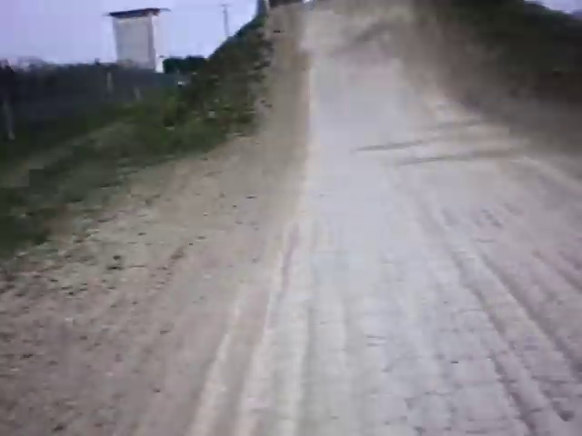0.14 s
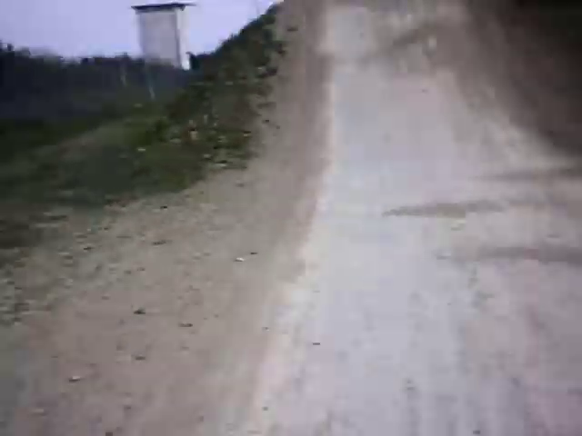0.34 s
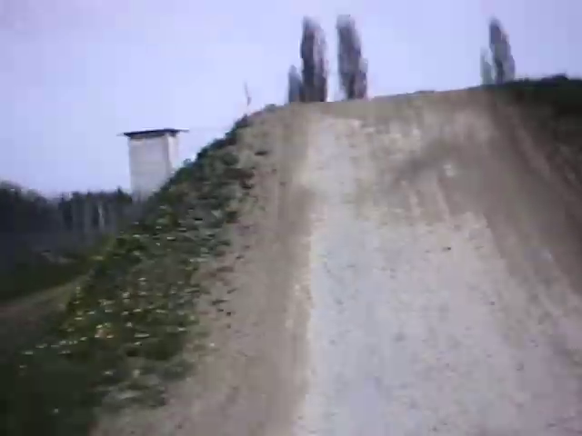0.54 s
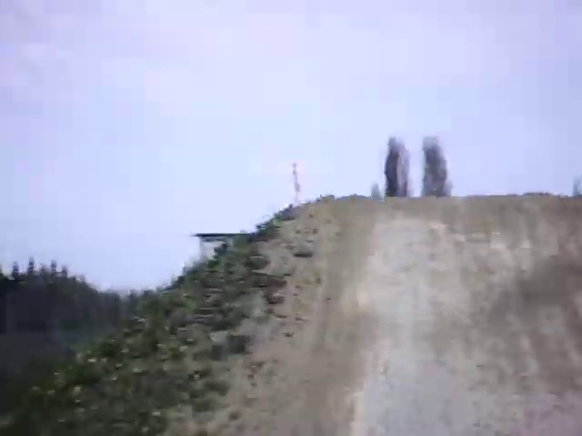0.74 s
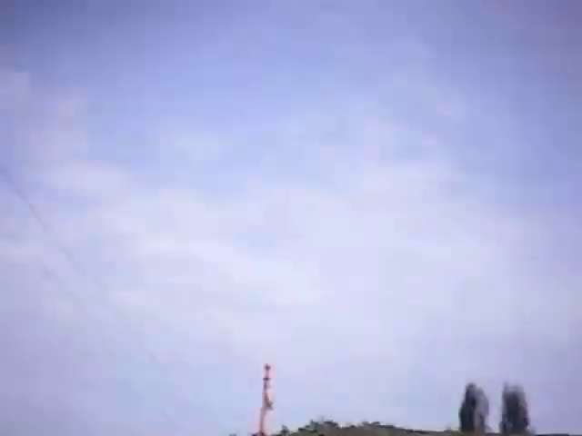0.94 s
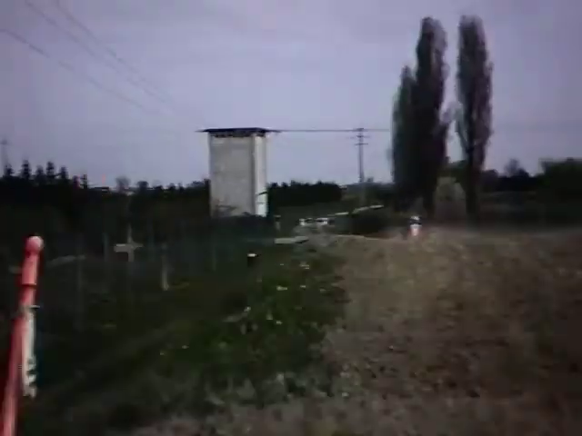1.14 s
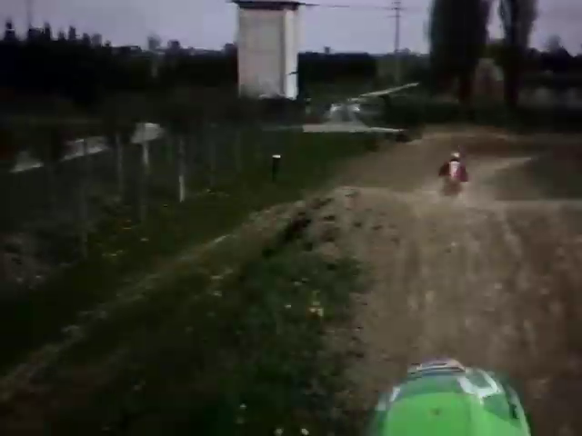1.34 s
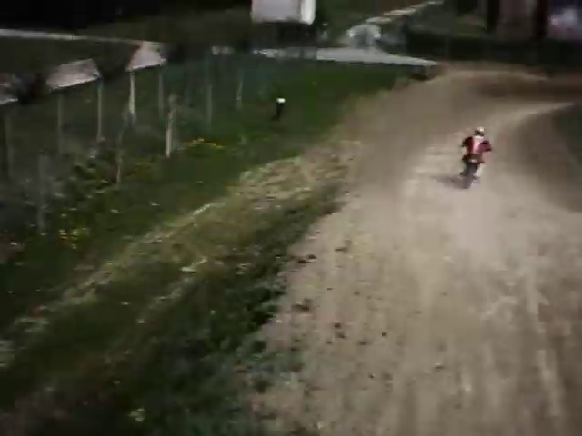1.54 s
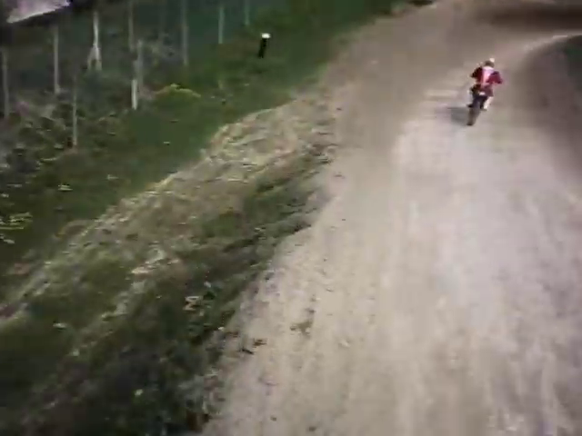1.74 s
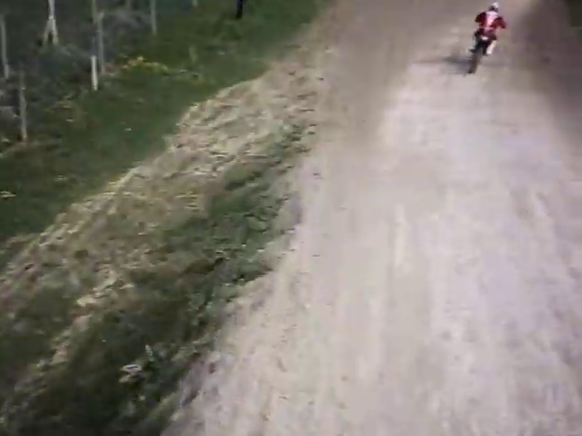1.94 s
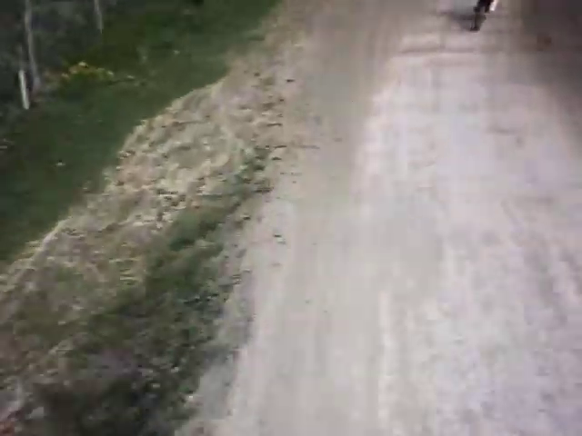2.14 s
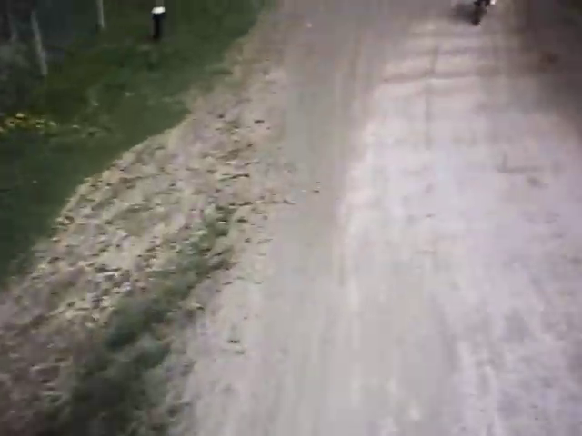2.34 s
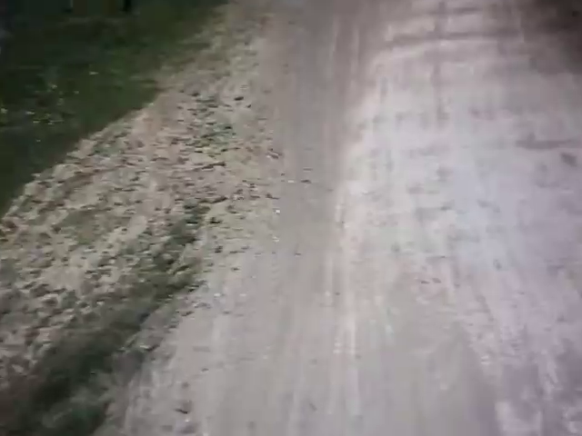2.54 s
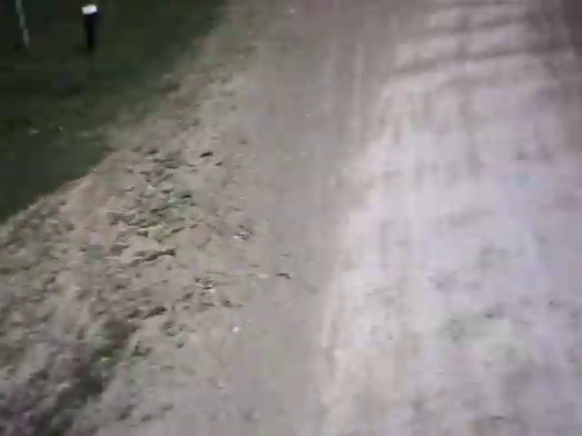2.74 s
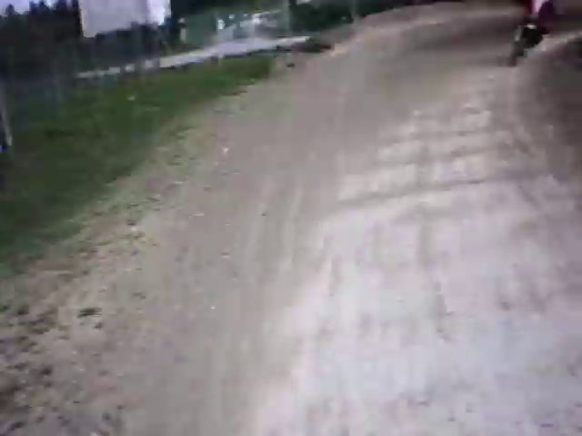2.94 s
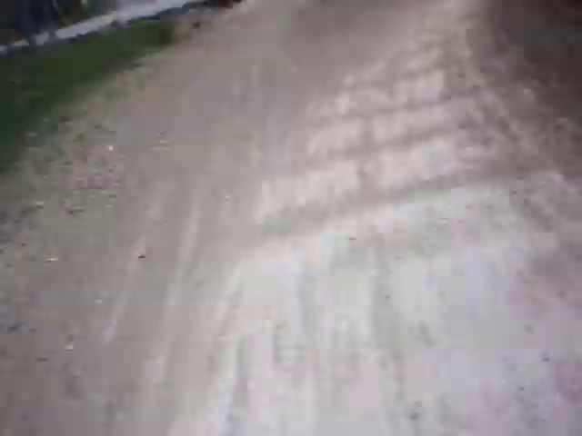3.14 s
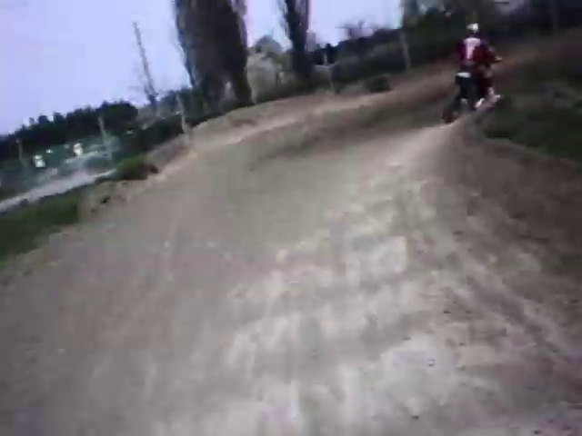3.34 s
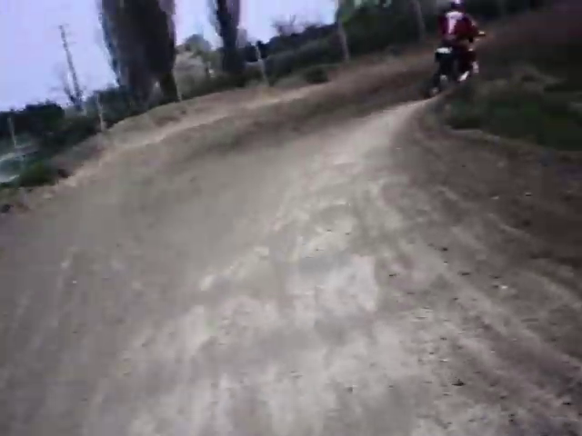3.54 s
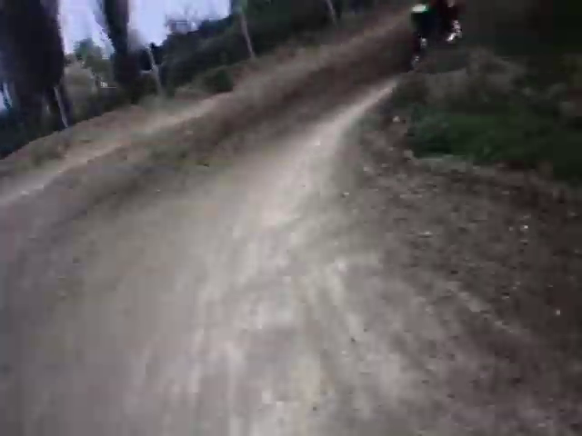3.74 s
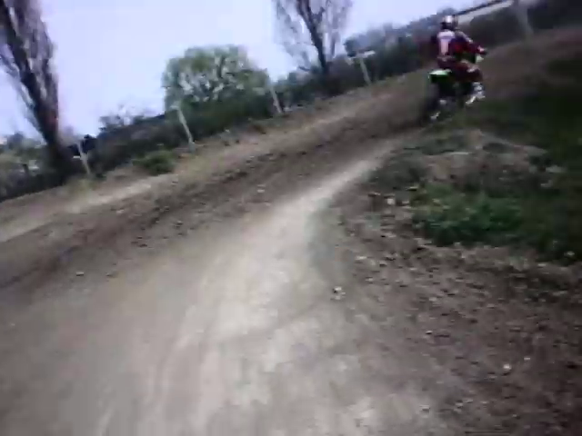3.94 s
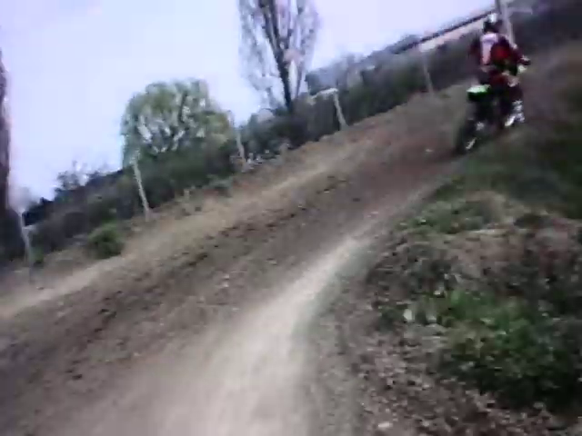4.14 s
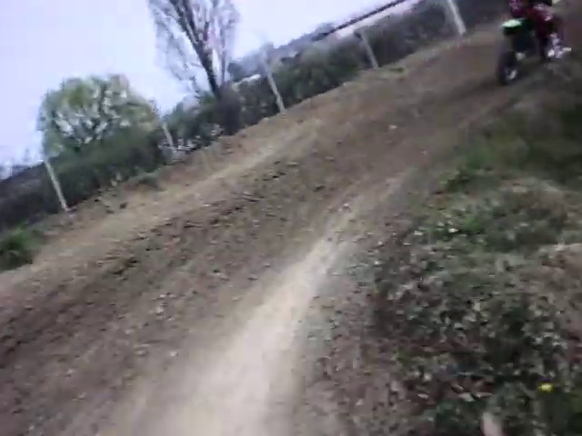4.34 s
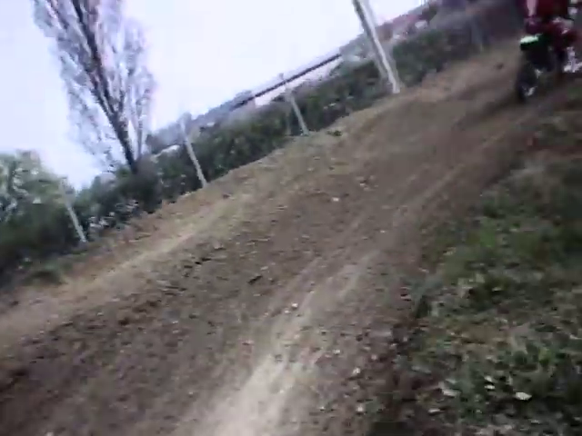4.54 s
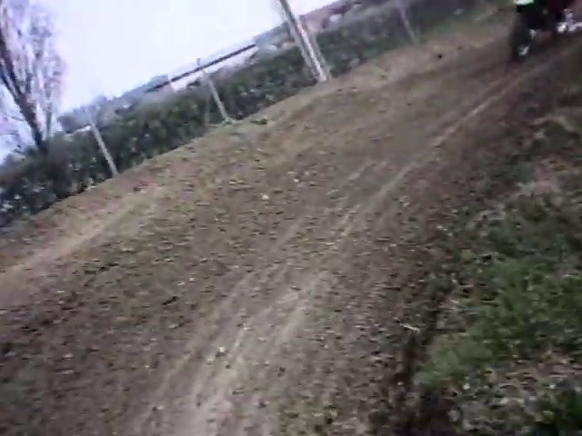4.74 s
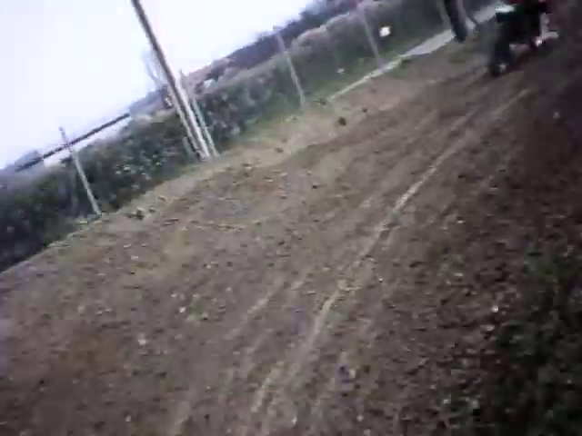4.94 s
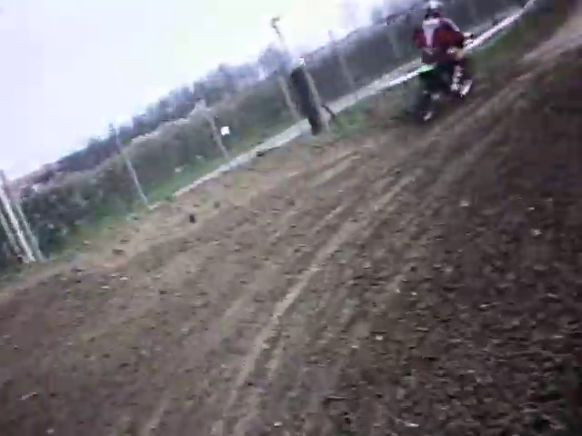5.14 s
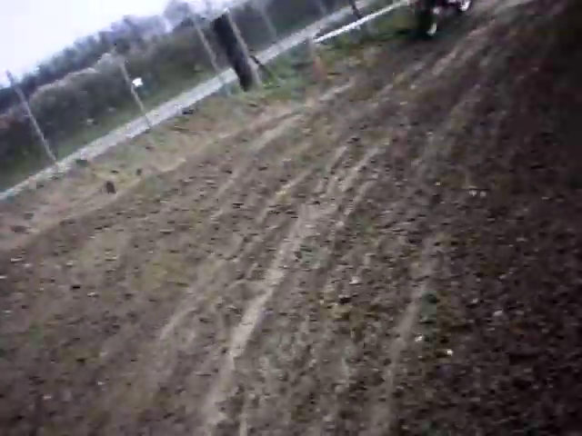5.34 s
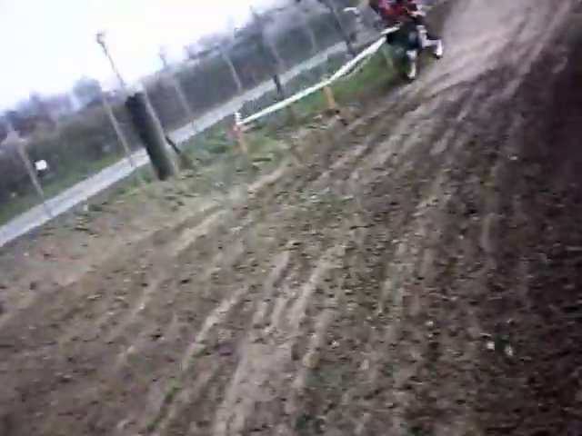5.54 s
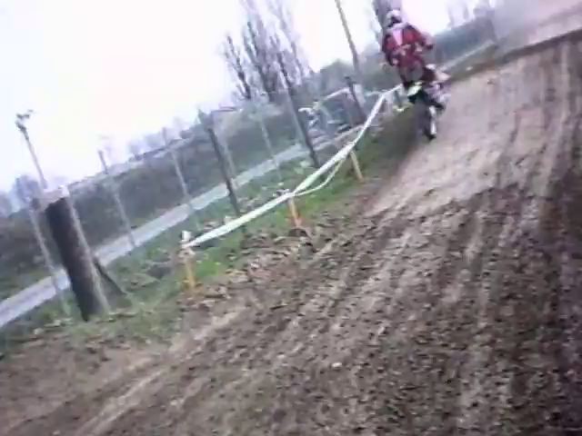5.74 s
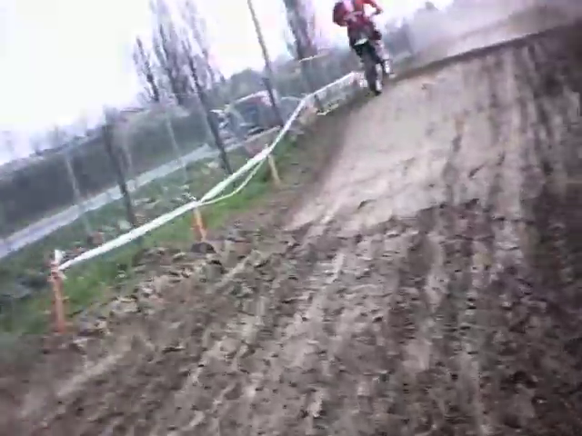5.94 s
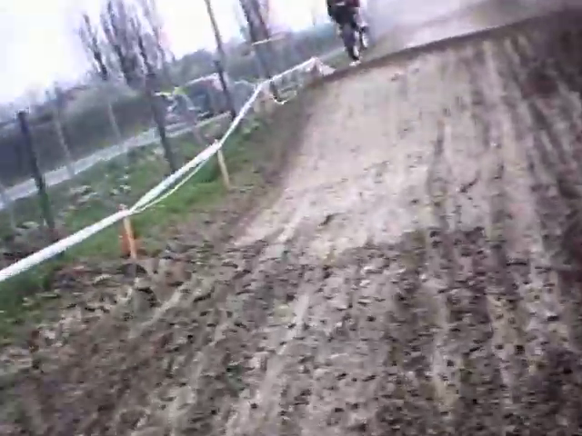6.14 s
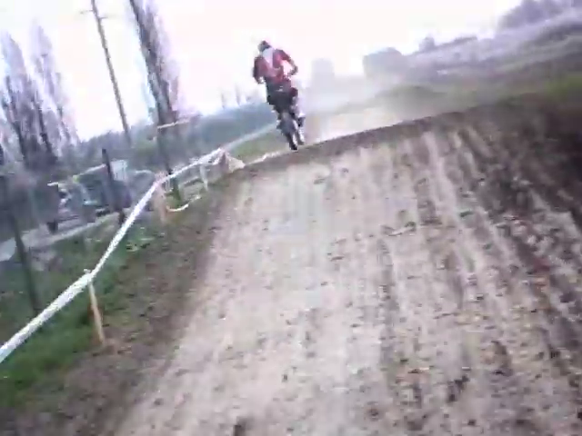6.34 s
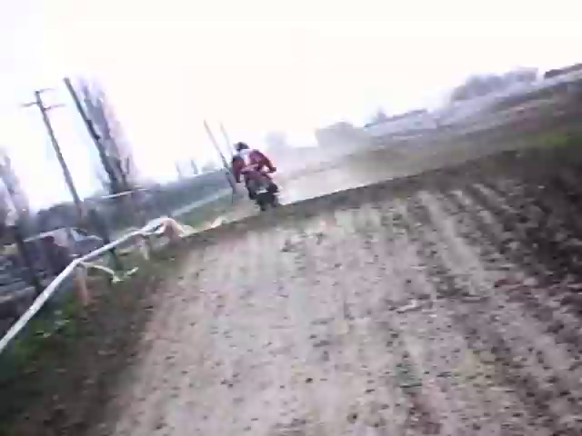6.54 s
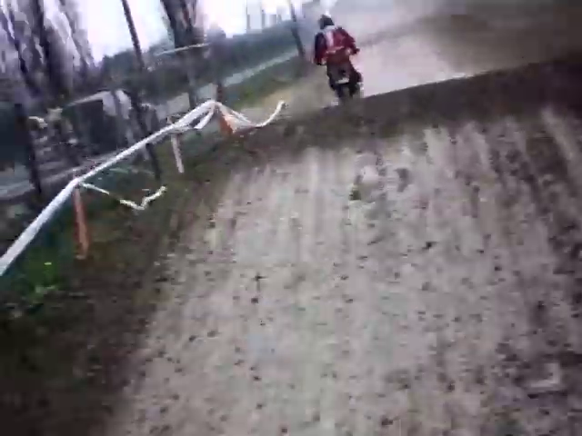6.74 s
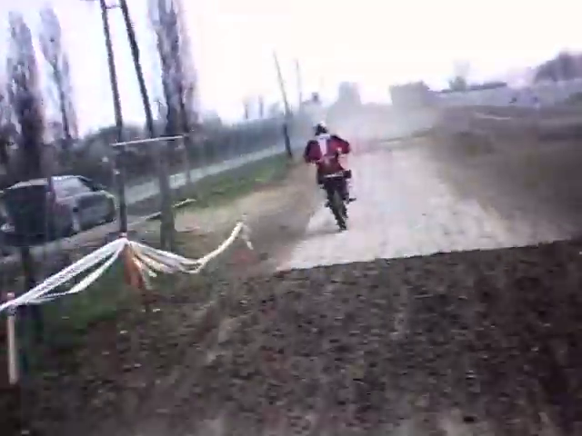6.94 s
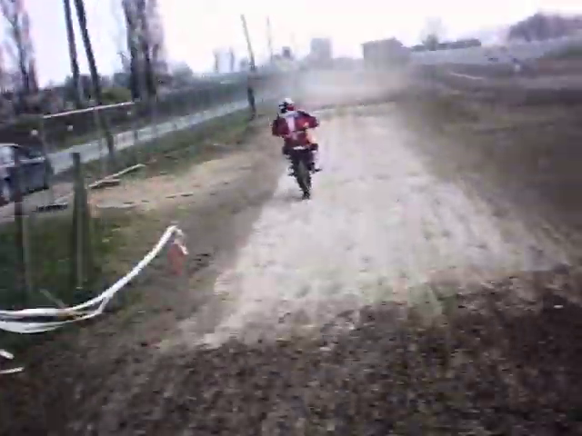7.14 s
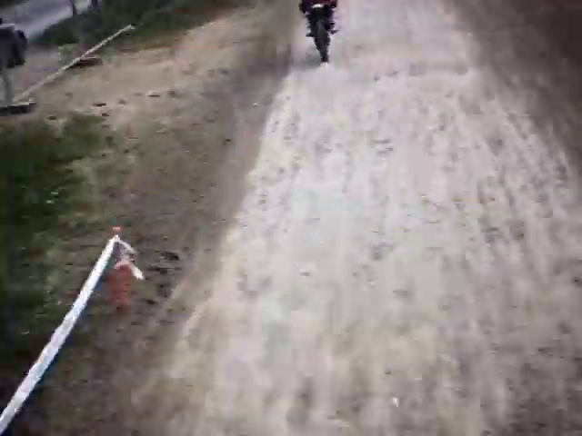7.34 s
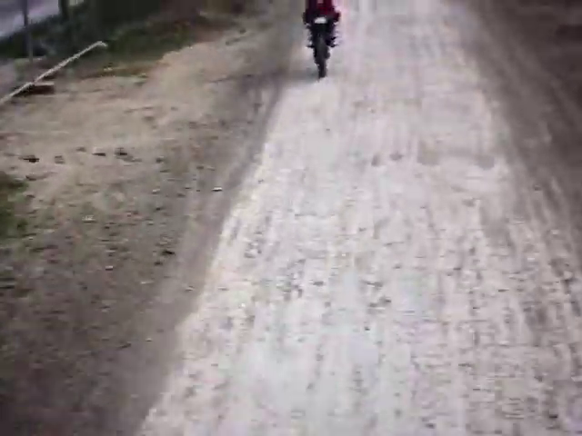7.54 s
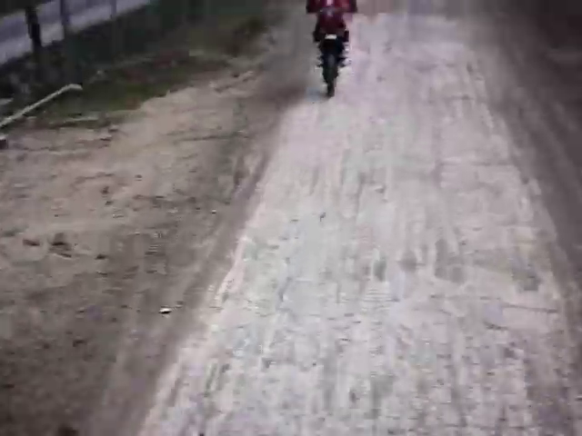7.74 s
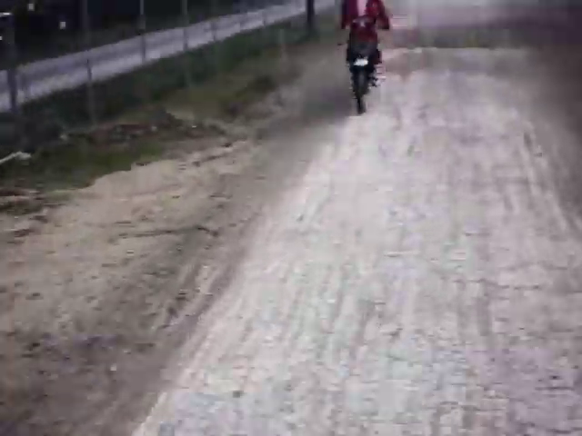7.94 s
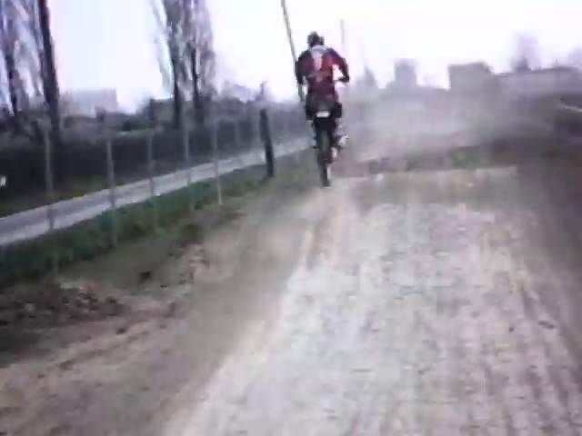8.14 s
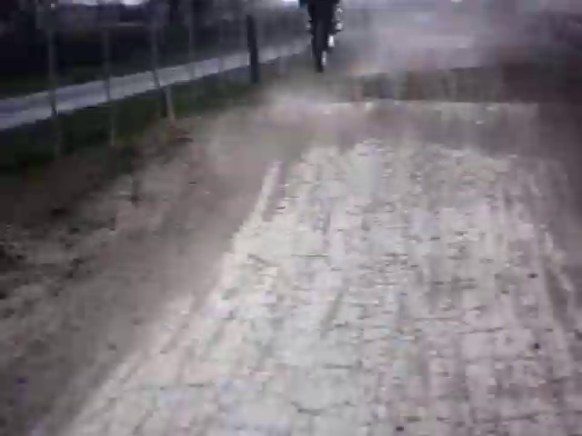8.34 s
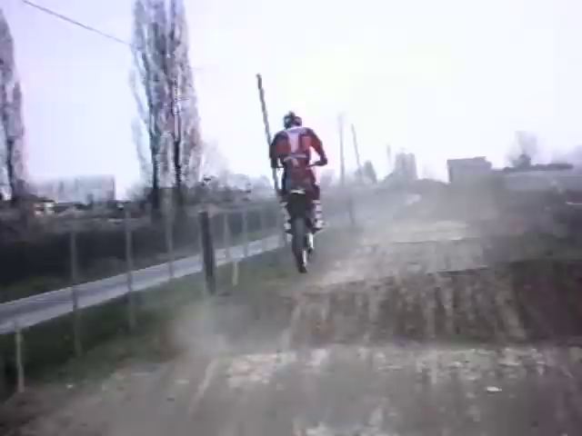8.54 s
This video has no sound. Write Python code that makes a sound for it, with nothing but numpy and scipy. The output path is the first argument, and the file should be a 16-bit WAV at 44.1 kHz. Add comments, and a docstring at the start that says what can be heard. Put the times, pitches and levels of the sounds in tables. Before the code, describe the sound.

Close on a four-stroke dirt bike, the engine barks at full throttle up a ramp, then cuts back with chassis knocks at the crest. It coasts with short throttle blips, tyres crunching and wind rumbling, and drops to a low chug in a bend while a two-stroke whines ahead. It pulls away with sharp pops, eases and blasts again. Muffled, narrow-band microphone on the rider, overloaded at the loudest peaks.

```python
"""A four-stroke dirt bike laps a dirt track, heard from its rider: firing clicks excite airbox and exhaust modes.
It barks up a jump, coasts with a few throttle blips, idles round a bend and pulls away again with pops.
Chain and valve gear clatter and the chassis knocks over bumps: ticks and clicks through one frame spectrum.
Tyres crunch, wind rumbles and bumps buffet the microphone: filtered noise that follows pace and ground.
A two-stroke ahead whines in harmonics and hiss; a narrow-band recorder clips the loudest peaks."""
import sys
import numpy as np
from scipy import signal
from scipy.fft import rfft, irfft
from scipy.io import wavfile
from scipy.ndimage import uniform_filter1d

SR = 44100
rng = np.random.default_rng(int(sys.argv[2]) if len(sys.argv) > 2 else 0)


def dump(signal):
    """Clip the signal to [-1, 1] and save it as 16-bit WAV at the path in sys.argv[1]."""
    limited = np.clip(np.atleast_2d(signal).T, -1, 1)
    pcm = np.round(limited * 32767).astype(np.int16)
    wavfile.write(sys.argv[1], SR, pcm)


N = 382788

# exhaust resonances, bark and rasp: (frequency [Hz], bandwidth [Hz], gain [dB])
BARK_MODES = [(510, 110, -25.5), (632, 47, -10.5), (973, 39, -1.5), (1210, 45, 4), (1334, 57, 5.5),
              (1366, 85, 6.5), (1459, 152, -0.5), (1789, 43, -2.5)]
RASP_MODES = [(2048, 220, 0.5), (2860, 410, 0.5), (3276, 204, 3), (3900, 490, -8)]
# frame response to ticks and knocks: (frequency [Hz], gain [dB])
FRAME_SPECTRUM = [(200, -25), (430, -17.5), (590, -8), (720, -20), (860, -12), (990, -1.5), (1250, 0),
                  (1460, 0), (1620, -11.5), (1820, -12.5), (2250, -22), (2900, -16), (3380, -17.5),
                  (3650, -24.5), (4200, -27.5)]
# rumble of wind and engine shake: (frequency [Hz], relative level [dB])
RUMBLE_SPECTRUM = [(20, -35), (50, -18.5), (90, -1.5), (130, 0.5), (230, -2), (330, -9), (450, -15),
                   (800, -23.5), (2000, -45.5)]

CRUISE_PER_S = 55  # firing rate at cruising revs
FIRING_AT_S = 5.857  # a combustion falls here, before jitter


def from_db(db):
    """Decibels to gain."""
    return 10 ** (np.asarray(db) / 20)


def rms_one(x):
    """Scale to rms 1."""
    return x / np.sqrt(np.mean(x ** 2) + 1e-20)


def steady(x, size=4001):
    """Hold the running rms near 1, keeping the single pulses."""
    power = uniform_filter1d(uniform_filter1d(x ** 2, size), size // 2)
    return x / np.sqrt(np.abs(power) + 1e-14)


def in_time(rows):
    """Interpolate each column of a (time, ...) table to every sample."""
    time_s, *columns = np.transpose(rows)
    return [np.interp(np.arange(N) / SR, time_s, column) for column in columns]


def drift(knots_per_s):
    """Random curve of rms 1, linear between random knots."""
    knots = rng.standard_normal(2000)
    return rms_one(np.interp(np.arange(N) / SR * knots_per_s, np.arange(len(knots)), knots))


def colour(x, spectrum, size=8192):
    """Causal (minimum-phase) filter with the given spectrum, built by folding the cepstrum."""
    hz, db = np.transpose(spectrum)
    grid_hz = np.maximum(np.arange(size // 2 + 1) * SR / size, 1)
    gain = from_db(np.interp(np.log(grid_hz), np.log(hz), db))
    cepstrum = irfft(np.log(gain))
    cepstrum[1:size // 2] *= 2
    cepstrum[size // 2 + 1:] = 0
    impulse_response = irfft(np.exp(rfft(cepstrum)))
    return signal.fftconvolve(x, impulse_response)[:N]


def resonate(x, modes):
    """Parallel two-pole resonances with alternating signs."""
    out = np.zeros(N)
    for k, (hz, width_hz, db) in enumerate(modes):
        r = np.exp(-np.pi * width_hz / SR)
        poles = [1, -2 * r * np.cos(2 * np.pi * hz / SR), r * r]
        ringing = signal.lfilter([1, 0, -1], poles, x + 1e-18) * (1 - r * r) / 2
        out += (-1) ** k * from_db(db) * ringing
    return out


def band(x, low_hz, high_hz):
    """Band-pass with steep skirts."""
    return signal.sosfilt(signal.butter(3, [low_hz, high_hz], "band", fs=SR, output="sos"), x)


def gate(start_s, end_s, edge_s):
    """1 between two moments, with sloping edges."""
    t = np.arange(N) / SR
    return np.clip(np.minimum(t - start_s, end_s - t) / edge_s + 0.5, 0, 1)


def strikes(rows):
    """One click for each (time [s], level [dB]) row."""
    clicks = np.zeros(N)
    for time_s, db in rows:
        clicks[round(time_s * SR)] = from_db(db)
    return clicks


def puffs(clicks, decay_s):
    """Each click lets out a dying noise burst whose expected energy does not depend on its decay."""
    r = np.exp(-1 / (decay_s * SR))
    envelope = signal.lfilter([np.sqrt(1 - r * r)], [1, -r], clicks + 1e-18)
    return envelope * rng.standard_normal(N)


def firings(per_s, jitter_s, uneven_db):
    """One click per combustion, each a little off in time and strength."""
    turns = np.cumsum(per_s) / SR
    turns -= turns[round(FIRING_AT_S * SR)]
    at = np.flatnonzero(np.diff(np.floor(turns)))
    late_s = jitter_s * rng.standard_normal(len(at))
    strength_db = uneven_db * rng.standard_normal(len(at))
    clicks = np.zeros(N)
    clicks[np.clip(at + np.round(late_s * SR).astype(int), 0, N - 1)] = from_db(strength_db)
    return clicks


def throttle(octaves):
    """Each pull ramps the throttle open, swells while held and dies away once shut."""
    # pulls, gains at cruising revs before swell; boom's is that reached after boom_full_s:
    # (opens [s], shuts [s], bark [dB], airbox boom [dB], rasp [dB])
    pulls = [(-.4, 0.633, -20.5, -12, -23), (1.769, 1.906, -21, -14, -32), (2.789, 2.872, -19, -22, -32.5),
             (5.668, 7.104, -22.5, -21, -33.5), (7.936, 8.173, -18.5, -10.5, -31.5)]
    open_s, shut_s = 0.038, 0.036  # ramp length, decay constant
    bark_db_per_octave, boom_db_per_octave, rasp_db_per_octave = 11, 4.5, 5.5
    bark_db_per_s, boom_db_per_s, rasp_db_per_s = 3.5, 16, 1.5  # swell
    boom_full_s = 0.9
    t = np.arange(N) / SR
    opening, bark, boom, rasp = np.zeros((4, N))
    for opens_s, shuts_s, bark_db, boom_db, rasp_db in pulls:
        held_s = np.clip(t, opens_s, shuts_s) - opens_s
        boom_lack_s = np.maximum(boom_full_s - held_s, 0)
        pull = np.minimum(held_s / open_s, 1) * np.exp(-np.clip(t - shuts_s, 0, 1) / shut_s)
        opening += pull
        bark += pull * from_db(bark_db + bark_db_per_octave * octaves + bark_db_per_s * held_s)
        boom += pull * from_db(boom_db + boom_db_per_octave * octaves - boom_db_per_s * boom_lack_s)
        rasp += pull * from_db(rasp_db + rasp_db_per_octave * octaves + rasp_db_per_s * held_s)
    return opening, bark, boom, rasp


def combustion(fired, bark_gain, boom_gain, rasp_gain):
    """Under throttle every firing thumps the airbox and lets out a barking, rasping burst of gas."""
    # close pair, rings on between firings: (frequency [Hz], bandwidth [Hz], gain [dB])
    airbox_modes = [(251.3, 39.6, -3.5), (287.3, 33.3, -0.5)]
    thump = fired + 0.24 * puffs(fired, decay_s=0.009)
    boom = steady(band(resonate(thump, airbox_modes), 130, 470))
    gas = puffs(fired, decay_s=0.005)
    bark = steady(band(resonate(1.27 * fired + gas, BARK_MODES), 480, 2100))
    crack = puffs(fired, decay_s=0.003)  # sharp front of the burst
    rasp = steady(band(resonate(0.25 * fired + crack + 0.8 * gas, RASP_MODES), 1200, 5000))
    return boom_gain * boom + bark_gain * bark + rasp_gain * rasp


def pops():
    """A rich charge cracks as the throttle snaps open, through the bark and rasp resonances."""
    # extra hard firings: (time [s], click level [dB])
    hard_firings = [(1.8297, 16), (1.8652, 20), (5.7237, 1), (5.8577, 16), (6.0412, 6), (6.4138, 14.5),
                    (6.636, 23), (6.6544, 17), (6.7336, 28), (8.0347, 11), (8.0823, 12)]
    clicks = strikes(hard_firings)
    gas = 0.32 * clicks + puffs(clicks, decay_s=0.0075)
    rasp = from_db(-12.5) * resonate(gas, RASP_MODES)
    return band(resonate(gas, BARK_MODES) + rasp, 500, 5000)


def tailpipe(per_s, octaves, opening):
    """The silencer behind the rider passes only orders 2 and 3 of the firing rate, a little unsteady."""
    # orders 2 and 3: (level at cruising revs [dB], rise [dB per octave], rise under throttle [dB])
    hum_orders = [(-41, 10, 7.5), (-40.5, 14.5, 3.5)]
    angle = 2 * np.pi * np.cumsum(per_s) / SR
    hum = np.zeros(N)
    for k, (db, db_per_octave, open_db) in enumerate(hum_orders, 2):
        level_db = db + db_per_octave * octaves + open_db * opening + 4.1 * drift(12)
        hum += from_db(level_db) * np.sqrt(2) * np.sin(k * angle + 0.25 * drift(25))
    return hum


def engine_shake(fired, octaves):
    """Firings shake the microphone as a low rumble, stronger with the revs."""
    return from_db(-37.5 + 5.5 * octaves) * steady(colour(fired, RUMBLE_SPECTRUM))


def clatter(fired, pace_db, bark_gain):
    """Chain, valve gear and grit tick densely into the frame, which also shakes with each pull."""
    ticks = (rng.random(N) < 900 / SR) * rng.standard_normal(N)
    valve_gear = rms_one(puffs(fired, decay_s=0.033))
    rattle = rms_one(ticks) + 0.28 * valve_gear + 1.42 * rng.standard_normal(N)
    gain = np.hypot(from_db(pace_db + 0.3), 0.47 * bark_gain)
    return gain * steady(colour(rattle, FRAME_SPECTRUM))


def knocks():
    """Landings and bumps shake the chassis, which rings like the clatter."""
    # (time [s], click level [dB])
    bumps = [(0.796, 16), (0.876, 19), (0.958, 29.5), (1.105, 15), (1.349, 2), (2.145, 9), (2.824, 23),
             (2.92, 17), (3.005, 24.5), (4.956, 10), (8.313, 23), (8.384, 22), (8.488, 22.5)]
    clicks = strikes(bumps)
    return colour(0.5 * clicks + puffs(clicks, decay_s=0.0029), FRAME_SPECTRUM)


def tyres(pace_db, rough_db):
    """Tyres crunch over dirt as dense random grains, lighter over the crest and down the jump."""
    # (frequency [Hz], relative level [dB])
    crunch_spectrum = [(100, -12.5), (300, -3), (430, -3), (580, 4.5), (800, 2), (1500, 1.5), (2200, -9),
                       (3300, -12.5), (4200, -22)]
    unloaded_db = -8.5 * gate(1.09, 1.75, edge_s=0.027)
    level_db = 1 + 1.427 * pace_db + 0.45 * rough_db + unloaded_db
    grit = (rng.random(N) < 4000 / SR) * rng.standard_normal(N)
    return from_db(level_db) * steady(colour(grit, crunch_spectrum))


def rough_ground():
    """Extra buffeting in dB over ramps and rough ground."""
    # (start [s], end [s], extra level [dB])
    rough_stretches = [(-.05, 0.701, 7.5), (.75, 1.0, 8), (2.67, 3.003, 16), (3.15, 3.3, 7),
                       (7.856, 8.05, 10), (8.08, 8.2, 14), (8.36, 8.664, 7.5)]
    return sum(db * gate(start_s, end_s, edge_s=0.027) for start_s, end_s, db in rough_stretches)


def buffeting(pace_db, rough_db):
    """Bumps buffet the microphone with very low noise."""
    # (frequency [Hz], relative level [dB])
    buffet_spectrum = [(10, -12), (25, -4), (50, 6.5), (90, -8), (250, -34), (600, -66)]
    noise = steady(colour(rng.standard_normal(N), buffet_spectrum))
    return from_db(-30 + pace_db + rough_db) * noise


def wind(pace_db, rough_db):
    """Air rumbles on the microphone, following most of the swing in pace."""
    level_db = -11 + 0.81 * pace_db + 0.17 * rough_db
    return from_db(level_db) * steady(colour(rng.standard_normal(N), RUMBLE_SPECTRUM))


def leader(count=26):
    """The two-stroke sings and hisses through its pipe; ground reflections make harmonics swell and fade."""
    # blips out of the bend, then on the straight: (time [s], firing rate [1/s], level [dB])
    blips = [(3.9, 140, -57), (4.4, 162, -37.5), (4.83, 214, -27.5), (4.88, 209, -31), (4.95, 182, -38),
             (5.03, 193, -33), (5.09, 187, -36), (5.18, 218, -29.5), (5.26, 199, -33.5), (5.38, 206, -30),
             (5.55, 203, -31.5), (5.68, 170, -58), (7.0, 135, -64), (7.2, 142, -32.5), (7.35, 149, -29),
             (7.5, 157, -34), (7.85, 135, -60)]
    # colour dulls as it turns away: (time [s], pipe frequency factor [1], brightness [dB per octave])
    turn = [(5.6, 0.99, 2), (7.2, .9, -3.5)]
    # (frequency [Hz], relative level [dB])
    pipe_spectrum = [(190, -5), (390, -9), (600, -19), (1150, -14.5), (1480, 5), (1730, -1.5),
                     (2020, -13.5), (2400, -18), (2620, -18), (2850, 1.5), (3050, -17), (3280, -6.5),
                     (3700, -21.5), (4000, -20.5)]
    per_s, level_db = in_time(blips)
    shift, bright_db_per_octave = in_time(turn)
    angle = 2 * np.pi * np.cumsum(per_s * (1 + 0.008 * drift(45))) / SR
    pipe_hz, pipe_db = np.transpose(pipe_spectrum)
    tone = np.zeros(N)
    for k in range(1, count):
        hz = k * per_s / shift
        bright_db = bright_db_per_octave * np.log2(np.maximum(hz / 1500, 1))
        gain = from_db(np.interp(hz, pipe_hz, pipe_db) + bright_db)
        tone += gain * (1 + 0.35 * drift(14)) * np.cos(k * angle + 0.5 * drift(90))
    hiss = colour(rng.standard_normal(N), pipe_spectrum) * (1 + 1.2 * np.cos(angle))
    return from_db(level_db) * (steady(tone) + 0.6 * rms_one(hiss))


def scene():
    """Own engine, chassis, ground and wind, and the bike ahead."""
    # engine speed: (time [s], firing rate [1/s])
    engine_speed = [(0, 67), (.18, 68), (.24, 73.5), (.31, 73), (.39, 81.5), (.57, 85), (.68, 79), (.8, 56),
                    (1.1, 54), (1.45, 42), (1.72, 53), (1.86, 64), (2.3, 60), (2.7, 45), (2.82, 56),
                    (3.0, 48), (3.8, 38), (5.0, 31), (5.4, 34.5), (5.65, 33), (5.8, 37.5), (6.0, 37.5),
                    (6.2, 43), (6.44, 47), (6.55, 42), (6.74, 57), (6.84, 53), (7.1, 54), (7.3, 44),
                    (7.6, 39), (7.88, 43), (8.02, 64), (8.25, 53), (8.68, 42)]
    # pace over the ground, as loudness of the running bike: (time [s], level [dB])
    pace = [(0, -16), (.6, -14), (.8, -16.5), (1.0, -19.5), (1.14, -22.5), (1.6, -23.5), (2.05, -22),
            (2.35, -23.5), (3.35, -23.5), (3.8, -25.5), (4.4, -29.5), (5.1, -34), (5.6, -32), (6.3, -26.5),
            (7.1, -22), (7.45, -26), (7.85, -26), (8.1, -22), (8.68, -24.5)]
    per_s, = in_time(engine_speed)
    pace_db, = in_time(pace)
    octaves = np.log2(per_s / CRUISE_PER_S)
    opening, bark_gain, boom_gain, rasp_gain = throttle(octaves)
    fired = firings(per_s, jitter_s=0.00006, uneven_db=0.8)
    exhaust = combustion(fired, bark_gain, boom_gain, rasp_gain) + pops()
    engine = exhaust + tailpipe(per_s, octaves, opening) + engine_shake(fired, octaves)
    chassis = clatter(fired, pace_db, bark_gain) + knocks()
    rough_db = rough_ground()
    riding = tyres(pace_db, rough_db) + buffeting(pace_db, rough_db) + wind(pace_db, rough_db)
    return (engine + chassis + riding + leader())[None]


def record(dry):
    """Narrow-band recorder: the microphone rounds loud peaks, and the loudest are clipped flat."""
    # (frequency [Hz], gain [dB])
    response = [(20, -0.5), (3950, -1.5), (4200, -9.5), (4400, -24), (4600, -40), (4850, -75.5)]
    soft_limit, overload, stopband_hz = 0.85, 0.72, 15870
    rounded = soft_limit * np.tanh(dry[0] / soft_limit)
    clipped = np.clip(colour(rounded, response), -overload, overload)
    return signal.sosfilt(signal.cheby2(12, 70, stopband_hz, fs=SR, output="sos"), clipped)[None]


dry = scene()
out = record(dry)
dump(out)
```